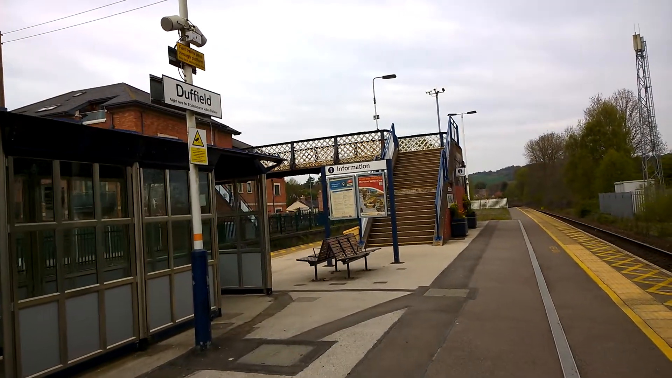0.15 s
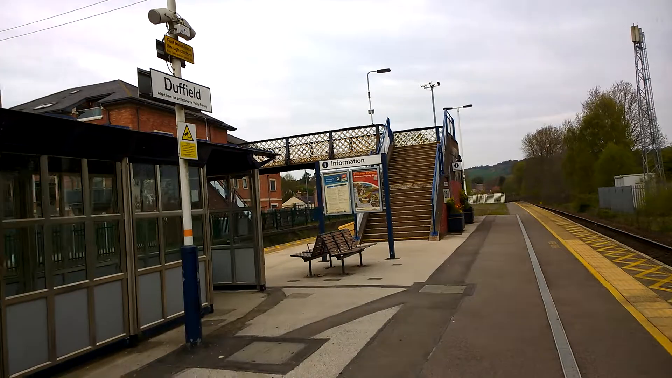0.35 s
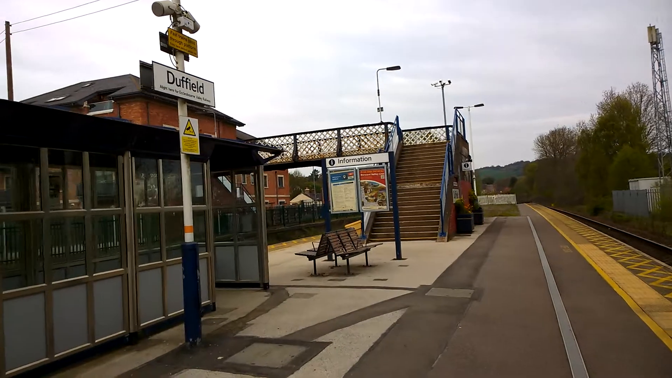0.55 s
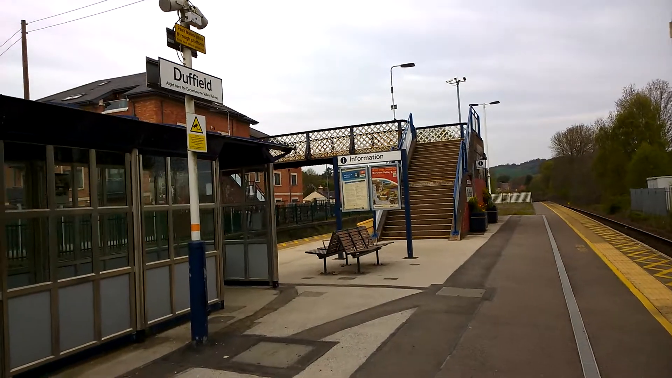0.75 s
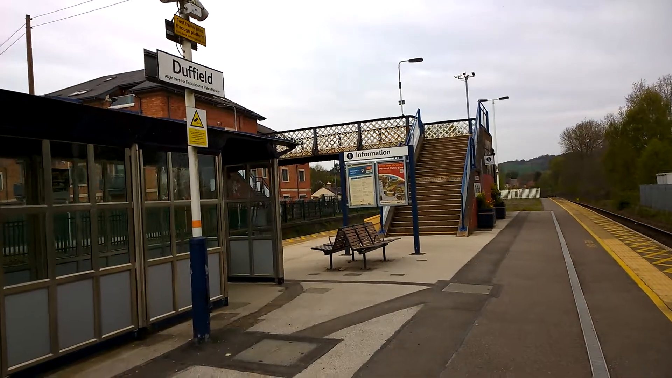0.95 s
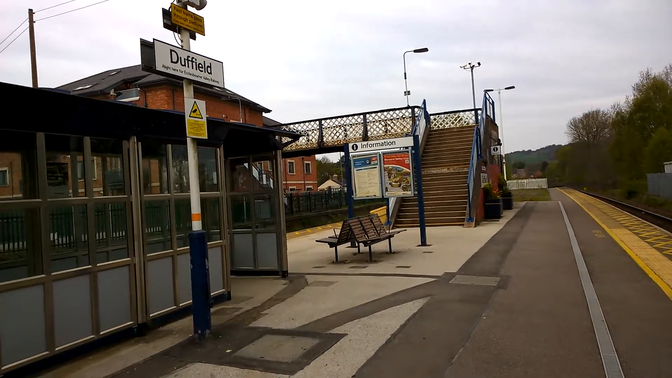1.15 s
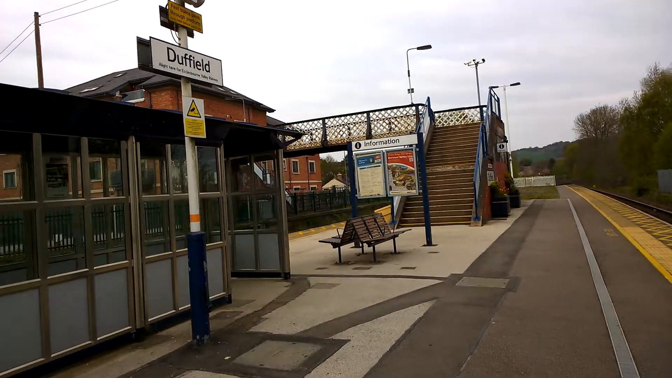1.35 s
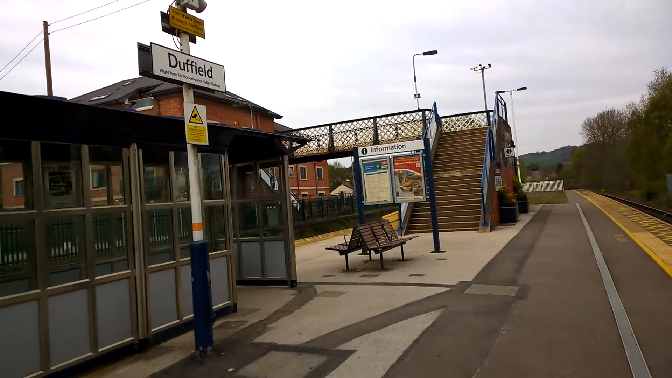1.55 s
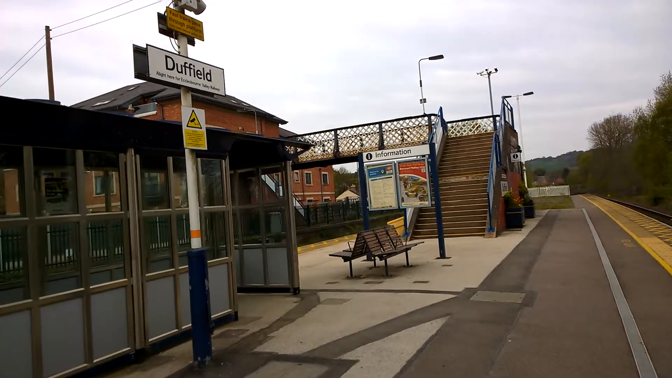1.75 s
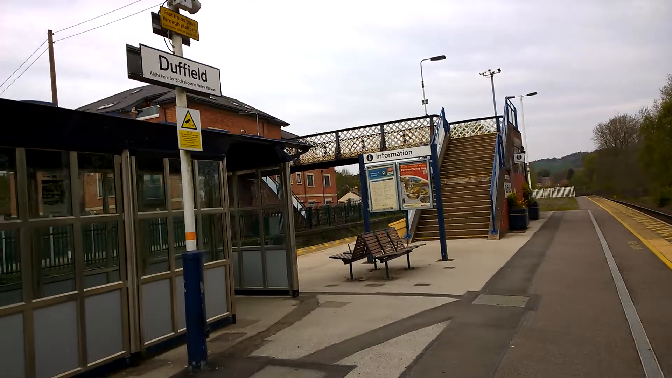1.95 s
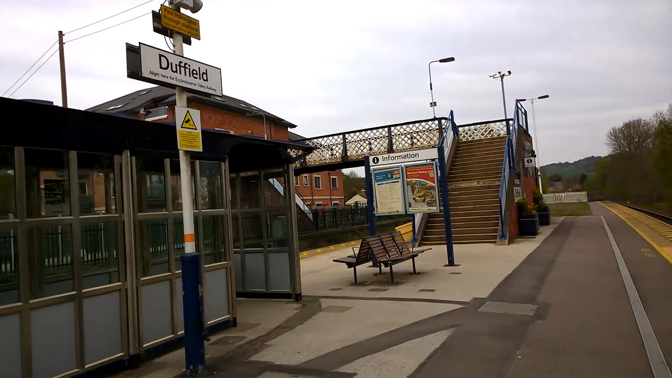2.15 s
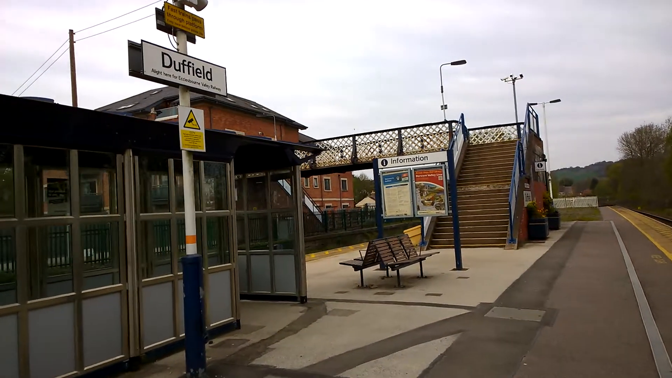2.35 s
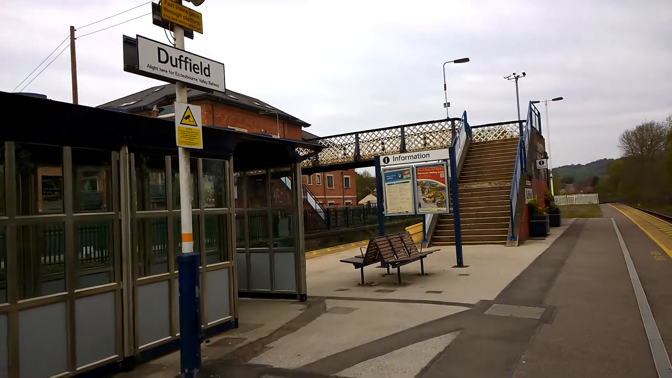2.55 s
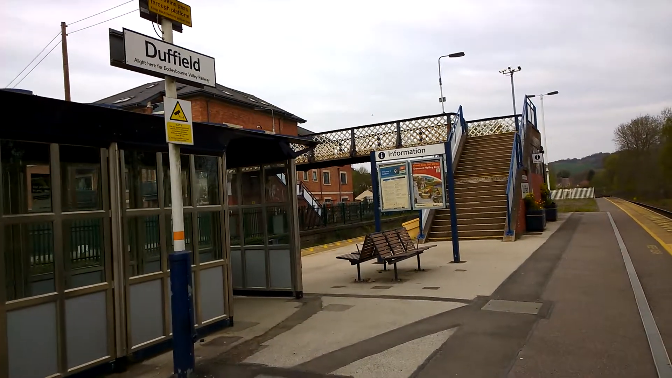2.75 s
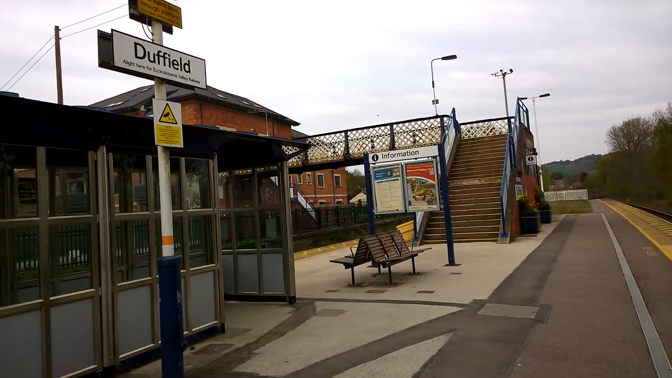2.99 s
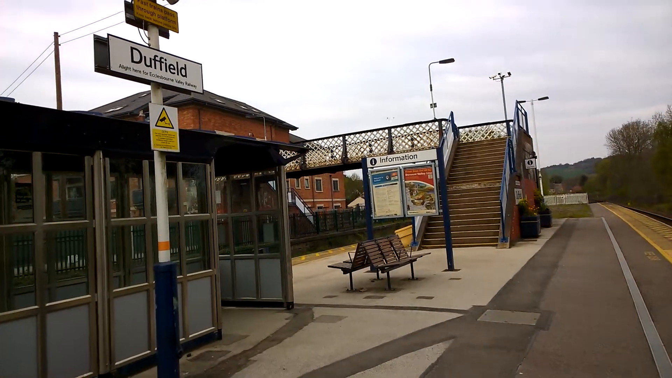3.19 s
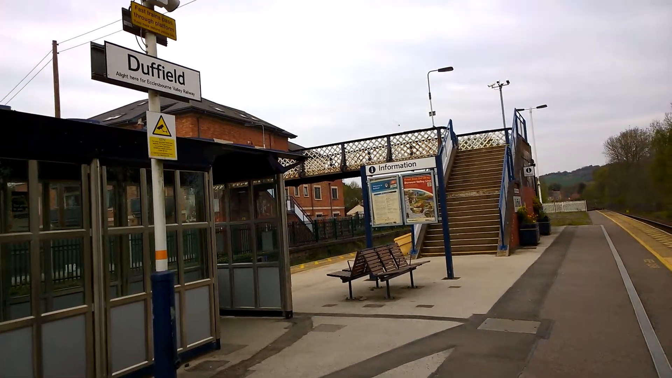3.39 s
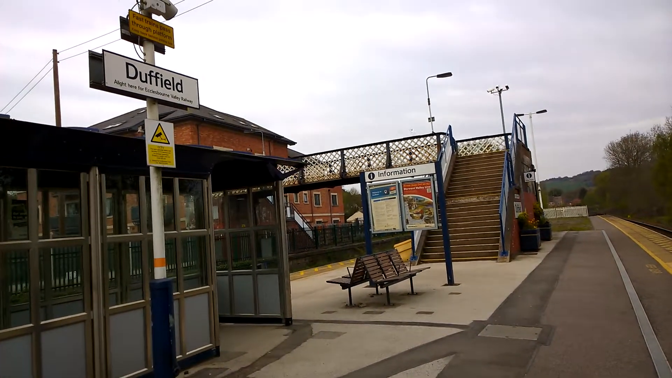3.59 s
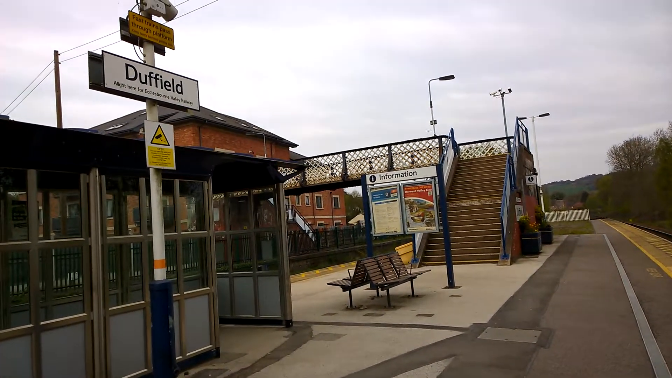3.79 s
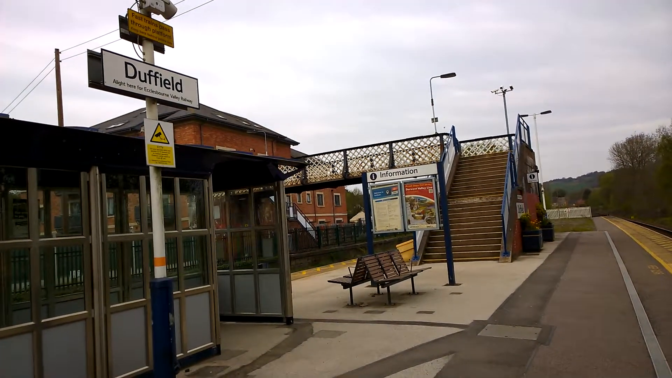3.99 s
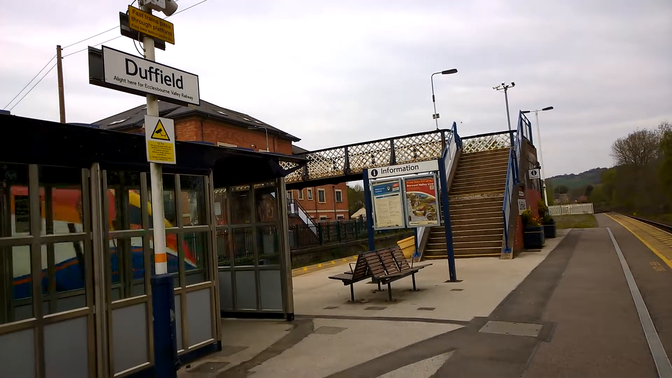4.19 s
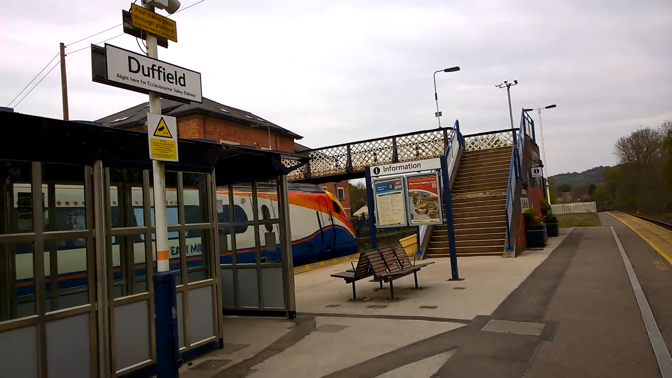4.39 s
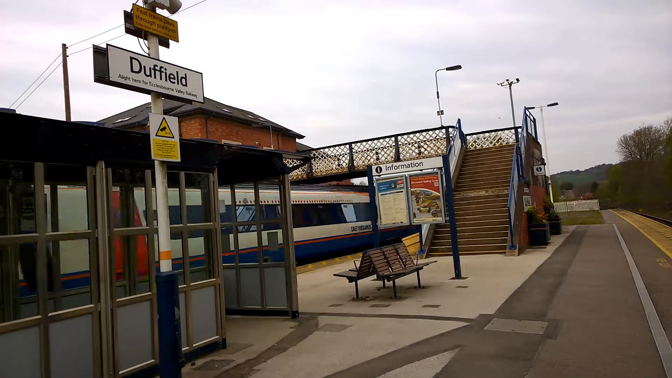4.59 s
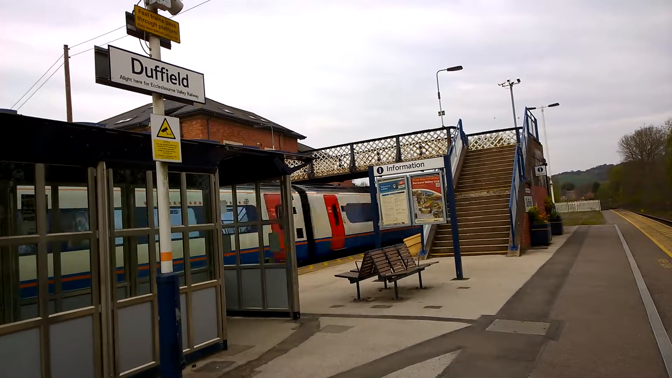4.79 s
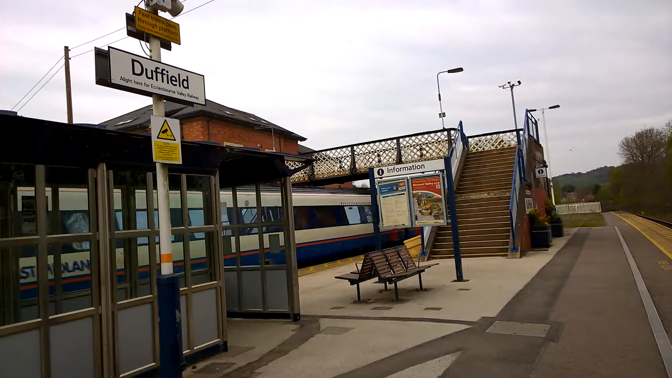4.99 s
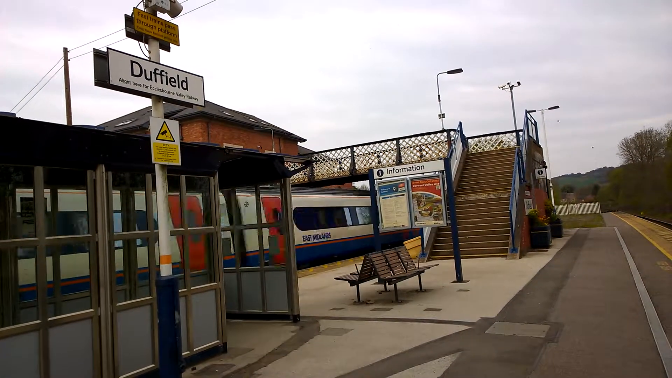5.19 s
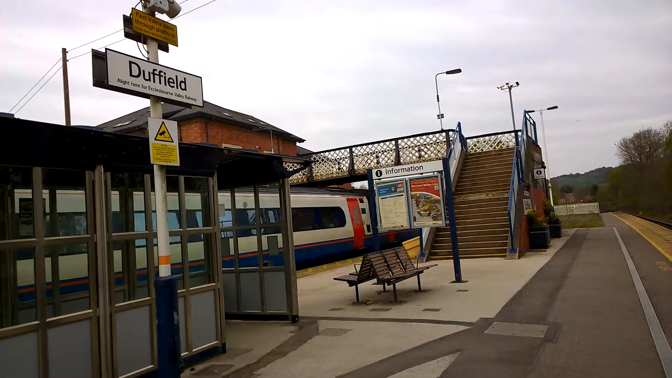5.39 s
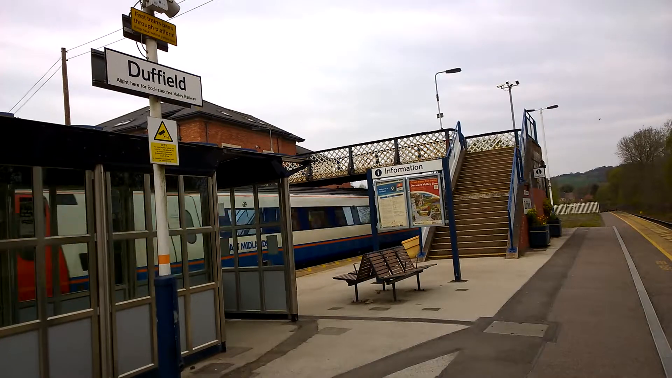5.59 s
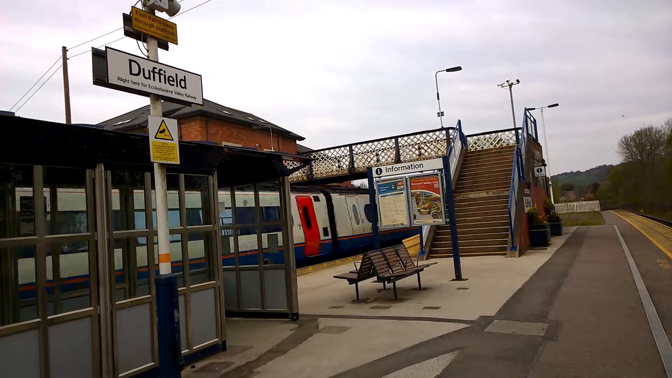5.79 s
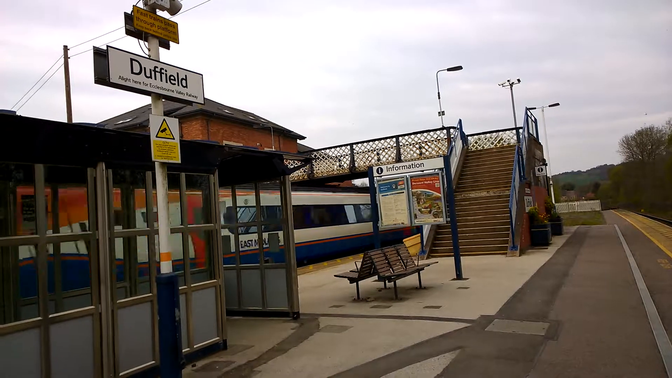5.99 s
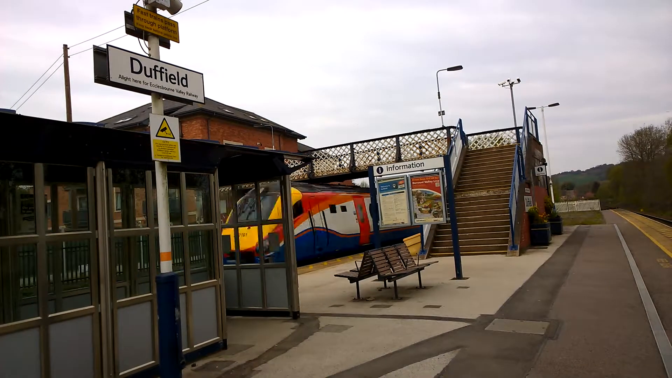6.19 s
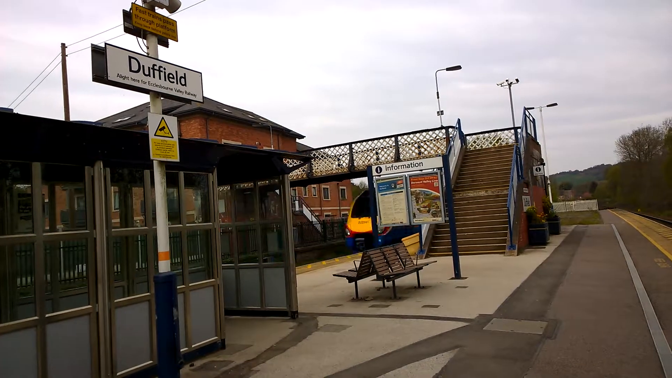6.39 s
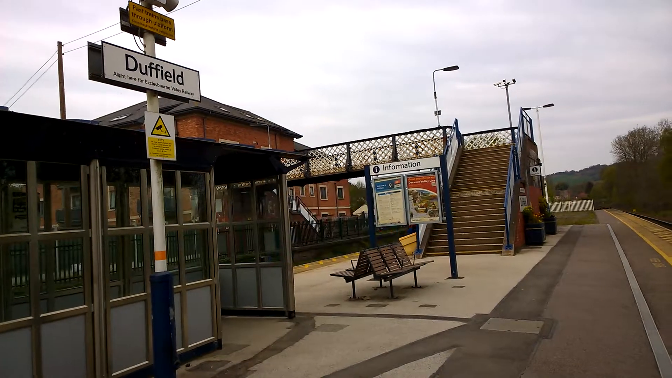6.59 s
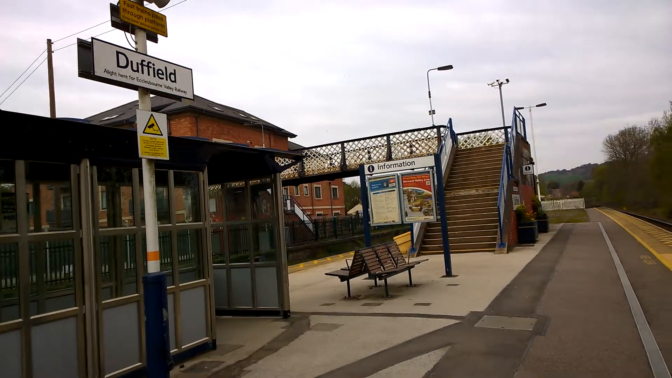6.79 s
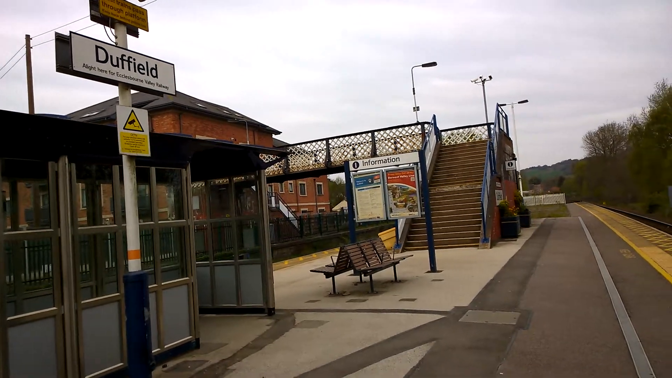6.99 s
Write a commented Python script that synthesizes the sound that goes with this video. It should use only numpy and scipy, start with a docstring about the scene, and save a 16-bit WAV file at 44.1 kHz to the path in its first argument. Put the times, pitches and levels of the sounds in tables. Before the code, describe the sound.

Stereo handheld microphone on the far platform of a small station. Wind rumbles low while cloth rubs lightly nearby. A train approaches with surging bass and thin metallic rail singing, then rushes by for about two seconds, a dense roar with bogie howls, bursts of hiss and whistles sliding down in pitch. It recedes quickly, leaving rumble and fading rail hiss.

```python
"""A fast diesel train runs through a country station, behind a shelter, heard from the far platform.
Rumble, wheel roar, hiss and rushing air are coloured noises that swell and fade; singing rails and
bogies are narrow noise bands. Underfloor engines (tone stacks) and whistles drop in pitch going by.
A breeze rumbles on the two microphone ports throughout, over a quiet platform and a rustling sleeve."""
import sys
import numpy as np
from scipy import signal
from scipy.fft import rfft, irfft
from scipy.io import wavfile
from scipy.ndimage import uniform_filter1d

SR = 44100
rng = np.random.default_rng(int(sys.argv[2]) if len(sys.argv) > 2 else 0)


def inscribe(sig):
    """Save sig as 16-bit PCM at rate SR to the path in sys.argv[1].

    A 1-D sig is mono; a 2-D sig holds one channel per row.
    Samples are clipped to [-1, 1] before scaling.
    """
    pcm = np.round(np.clip(np.atleast_2d(sig).T, -1, 1) * 32767)
    wavfile.write(sys.argv[1], SR, pcm.astype(np.int16))


N = 310905

SIZE, HOP = 1024, 256  # samples in a spectral frame, and between frames
HZ = np.fft.rfftfreq(SIZE, 1 / SR)
FRAME_S = np.arange(N // HOP + 5)[:, None] * HOP / SR  # a column: time runs down, frequency across
TIME = np.arange(N) / SR
# the nose draws level, the middle is abreast, the tail has gone by (s)
NOSE_S, MIDDLE_S, TAIL_S = 3.807, 4.88, 5.737
ABREAST_S = 0.49  # the treble is undulled for this long either side of the middle
MACH = .135  # speed of the train over that of sound


def amp(db):
    """Decibels to gain."""
    return 10 ** (np.asarray(db) / 20)


def evened(x):
    """Scales to rms 1."""
    return x / np.sqrt(np.mean(abs(x) ** 2) + 1e-20)


def read(points, hz=HZ):
    """Reads a spectrum table on a log-frequency axis."""
    f, value = np.transpose(points)
    return np.interp(np.log(hz + 1), np.log(f + 1), value)


def follow(rows, t=FRAME_S):
    """The columns of a curve table at the times t."""
    s, *columns = np.transpose(rows)
    return [np.interp(t, s, column) for column in columns]


def drift(rate_hz):
    """Slow random wander of rms 1, smoothed above the given rate."""
    count = len(FRAME_S)
    corner = np.fft.rfftfreq(count, HOP / SR) / rate_hz
    spectrum = rfft(rng.standard_normal(count)) / (1 + corner ** 2)
    return evened(irfft(spectrum, count))


def hump(s, rise_s, fall_s):
    """A bell of height 1 in time."""
    return np.exp(-.5 * ((FRAME_S - s) / np.where(FRAME_S < s, rise_s, fall_s)) ** 2)


def gust(s, rise_s, fall_s, db):
    """Level in dB of one rush of noise."""
    return db + 10 * np.log10(hump(s, rise_s, fall_s) + 1e-20)


def together(*levels_db):
    """Level in dB of unrelated sounds heard at once: their powers add."""
    return 10 * np.log10(sum(amp(db) ** 2 for db in levels_db))


def passing(nose_db, middle_db, tail_db, near_s, ahead_db, behind_db):
    """Level in dB of a long source: it follows the cars going by and falls with distance before and after."""
    abreast_db = np.interp(FRAME_S, [NOSE_S, MIDDLE_S, TAIL_S], [nose_db, middle_db, tail_db])
    ahead = np.maximum(NOSE_S - FRAME_S, 0)
    behind = np.maximum(FRAME_S - TAIL_S, 0)
    loss_ahead_db = ahead_db * np.log10(1 + ahead / near_s)
    loss_behind_db = behind_db * np.log10(1 + behind / near_s)
    return abreast_db - loss_ahead_db - loss_behind_db


def layer(spectrum, level_db, knee_hz=16000, loss_db=0):
    """Power of a coloured noise; above the knee it dulls, in dB per kHz and per second of distance."""
    shape = amp(read(spectrum)) ** 2
    away_s = np.maximum(abs(FRAME_S - MIDDLE_S) - ABREAST_S, 0)
    dull_db = loss_db * away_s * np.maximum(HZ - knee_hz, 0) / 1000
    return shape / shape.sum() * amp(level_db - dull_db) ** 2


def band(hz, width):
    """Power spectrum of a noisy resonance, summing to 1."""
    shape = np.exp(-.5 * ((HZ - hz) / width) ** 2) + 1e-20
    return shape / shape.sum(axis=-1, keepdims=True)


def swell(s, length, hz, width, db):
    """Power of a noisy resonance that rises and fades."""
    return band(hz, width) * amp(db) ** 2 * hump(s, length, length)


def doppler(t, abreast, glide_s):
    """Pitch factor of a source moving along the track; the nearer it passes, the quicker the glide."""
    along = t - abreast
    return 1 / (1 + MACH * along / np.hypot(along, glide_s))


# Share of the sound that reaches the microphone straight. Each row: frequency in Hz, share from 0 to 1.
STRAIGHT_SHARE = [(50, 0.5), (250, 1), (500, 0.64), (1200, 0.59), (3300, 0.49), (6000, 0.08), (10000, 0.1),
                  (16000, .1)]
# The two ports ring differently. Each row: frequency in Hz, left minus right in dB.
PORT_DIFFERENCE = [(100, 2.5), (500, 0.5), (950, 1), (1900, 2), (2500, 0.5), (3200, -6.5), (3800, -2.5),
                   (4400, 1.5), (5200, 3), (6400, -8), (7600, 4.5), (8800, 2), (10000, -2), (12000, 5)]


def ports(power, lead_ms, spacing_ms=0.53):
    """Noise at two spaced ports: a direct wave that reaches the left one first, plus a diffuse field."""
    a, b, c, d = rng.standard_normal((*power.shape, 4)).transpose(2, 0, 1)
    share = np.clip(read(STRAIGHT_SHARE), 0, 1)
    khz = HZ / 1000
    direct = share * np.exp(-2j * np.pi * khz * lead_ms)
    diffuse = (1 - share) * np.sinc(2 * khz * spacing_ms)
    same = (direct + diffuse) * .994  # what the ports have in common; never quite all of it
    left = a + 1j * b
    right = same * left + np.sqrt(np.maximum(1 - abs(same) ** 2, 0)) * (c + 1j * d)
    half_db = read(PORT_DIFFERENCE) / 2
    frames = np.array([left * amp(half_db), right * amp(-half_db)]) * np.sqrt(power)
    sound = signal.istft(frames.swapaxes(1, 2), nperseg=SIZE, noverlap=SIZE - HOP)[1]
    return np.sqrt(3 / 2) * sound[:, :N]  # makes up for the overlap of independent frames


# The quiet of the platform. Each row: frequency in Hz, relative level in dB per Hz.
PLATFORM_COLOUR = [(100, 6), (1000, -12), (3000, -19), (4500, -18), (6100, -16), (8000, -32), (12000, -29),
                   (16000, -36)]


def platform():
    """Steady faint noise, heaviest in the bass."""
    return layer(PLATFORM_COLOUR, -61.5)


# The breeze on the microphone ports. Each row: frequency in Hz, relative level in dB per Hz.
BREEZE_COLOUR = [(4, -45), (12, -16), (24, -3), (35, 11), (52, 0), (80, -16), (120, -28), (400, -65),
                 (1500, -100)]


def breeze():
    """Moving air on the ports: a steady random rumble peaking near 35 Hz."""
    return layer(BREEZE_COLOUR, -32.5)


# A sleeve rustling by the right port. Each row: time in seconds, rise in seconds, fall in seconds, level in dB.
SLEEVE_RUBS = [(.04, .02, .02, -71), (.4, .045, .03, -64.5), (.61, .03, .02, -65), (.825, .022, .022, -65),
               (1.51, .018, .05, -65), (1.67, .06, .08, -63), (1.92, .07, .03, -69)]


def sleeve(ring_hz=6220, ring_width_hz=420, skirt_width_hz=1300, skirt_db=-5):
    """Cloth rubs close by: faint wide noise with a ring in it, stronger in the right port."""
    colour = band(ring_hz, ring_width_hz) + amp(skirt_db) ** 2 * band(ring_hz, skirt_width_hz)
    rubs = sum(amp(db) ** 2 * hump(s, rise, fall) for s, rise, fall, db in SLEEVE_RUBS)
    return ports(colour * rubs, 0) * amp([[-7], [0]])


# Fans and turbochargers whistling by. Each row: seconds when abreast, swell time in seconds,
# pitch before the Doppler shift in Hz, width in Hz, level in dB.
FAN_WHISTLES = [(4.35, .17, 8750, 240, -39), (4.705, .085, 5400, 450, -22.5), (5.2, .1, 5400, 350, -34),
                (5.3, .1, 8900, 240, -38.5), (5.73, .11, 9000, 260, -44.5)]


def whistles(early_s=.12, glide_s=.11):
    """Each noisy whistle is loudest as it comes up, and slides down in pitch going by."""
    power = 0
    for s, length, hz, width, db in FAN_WHISTLES:
        heard_hz = hz * doppler(FRAME_S, s, glide_s)
        power = power + swell(s - early_s, length, heard_hz, width, db)
    return power


# Underfloor engines. Each row: seconds when abreast, firing rate before the Doppler shift in Hz,
# share of the drone in dB.
UNDERFLOOR_ENGINES = [(4.3, 90, -14), (5.25, 89.4, -16), (5.65, 89.8, .5)]
# Engine note. Each row: multiple of the firing rate, level against the firing tone in dB.
ENGINE_NOTE = [(2 / 3, -20), (5 / 6, -12), (0.99, 0), (4 / 3, -15), (5 / 3, -11.5), (3, -28.5), (4, -20.5)]
# Swells of the drone. Each row: time in seconds, swell time in seconds, lift of the firing tone in dB,
# lift of its octave in dB.
DRONE_SURGES = [(1.38, .24, 1, 13), (2.55, .19, 10, 7), (3.02, .12, 6, 7), (5.13, .11, 1.5, 8.5),
                (5.48, .12, 7, 1)]
# How the firing tone and its octave pass the platform. Each holds: dB at the nose, dB at the middle,
# dB at the tail, near zone in seconds, fall ahead and fall behind in dB per decade of distance.
FIRING_LEVELS = (-19.5, -21.5, -21, .6, 35, 23)
OCTAVE_LEVELS = (-33, -35, -30, .6, 26, 5)


def engines(waver_hz=4, lead_ms=0.096, glide_s=.18):
    """Exhaust tones under Doppler shift; ground reflections make each one waver in level and phase."""
    waver, wander_rad = .25, .3  # rms, of level (as a fraction) and of phase
    firing_db, octave_db = passing(*FIRING_LEVELS), passing(*OCTAVE_LEVELS)
    for s, length, firing_lift_db, octave_lift_db in DRONE_SURGES:
        firing_db = firing_db + firing_lift_db * hump(s, length, length)
        octave_db = octave_db + octave_lift_db * hump(s, length, length)
    # the other multiples follow the firing tone
    tones = [(multiple, firing_db + db) for multiple, db in ENGINE_NOTE] + [(2, octave_db)]
    drone = np.zeros(N, complex)
    for s, hz, share_db in UNDERFLOOR_ENGINES:
        turns = np.cumsum(hz * doppler(TIME, s, glide_s)) / SR
        for multiple, db in tones:
            level = amp(db[:, 0] + share_db) * (1 + waver * drift(waver_hz))
            phase = wander_rad * drift(waver_hz) + 2 * np.pi * rng.random()
            path = np.interp(TIME, FRAME_S[:, 0], level * np.exp(1j * phase))
            drone += path * np.exp(2j * np.pi * multiple * turns)
    right = np.interp(TIME - lead_ms / 1000, TIME, drone.real)  # reaches the right port later
    return np.sqrt(2) * np.array([drone.real, right]) * amp([[.7], [-1.3]])


# Rails and wheels singing. Each row: time of the peak in seconds, swell time in seconds,
# frequency in Hz, width in Hz, level in dB.
SINGING_RAILS = [(.5, 0.4, 860, 31, -54), (3.05, 0.7, 1730, 69, -48), (3.13, 0.43, 3580, 220, -51.5),
                 (3.8, 0.28, 3550, 230, -40.5), (2.65, 0.21, 4700, 330, -52.5), (3, 0.22, 7250, 90, -66),
                 (3.15, 0.1, 9620, 80, -73), (4.9, 0.48, 2265, 70, -36.5), (6.8, 0.31, 8300, 85, -62),
                 (6.1, 0.066, 9800, 110, -54), (6.3, 0.25, 8700, 730, -54.5), (6.53, 0.034, 6600, 600, -53),
                 (6.37, .35, 4800, 450, -54.5)]


def singing():
    """Steel rings at its resonances: narrow noises, several of them swelling before the train is here."""
    return sum(swell(*row) for row in SINGING_RAILS)


# Howl of air round each bogie. Each row: time in seconds, swell time in seconds, frequency in Hz,
# width in Hz, level in dB.
BOGIE_HOWLS = [(3.95, 0.12, 400, 134, -21), (4.36, 0.075, 430, 60, -22), (4.52, 0.055, 300, 35, -25),
               (4.8, 0.042, 365, 28, -21), (5.26, .04, 485, 45, -19.5), (5.72, .09, 385, 18, -29.5)]


def bogies():
    """Air howls round the bogies: low narrow noises, one after another."""
    return sum(swell(*row) for row in BOGIE_HOWLS)


# Colour of the rail hiss and of the rushing air. Each row: frequency in Hz, relative level in dB per Hz.
HISS_COLOUR = [(2800, 1.5), (4100, -2), (4900, -1.5), (5500, 2.5), (6300, 4), (6900, 2), (7600, -7.5),
               (8800, -11.5), (10000, -7), (11500, -43), (16000, -50)]
AIR_COLOUR = [(2000, -13), (5000, 6.5), (8000, 5.5), (10000, 5), (11200, 1), (12500, -2.5), (15800, -5)]
# How the two pass the platform. Each holds: dB at the nose, dB at the middle, dB at the tail,
# near zone in seconds, fall ahead and fall behind in dB per decade of distance.
HISS_LEVELS = (-30, -30, -36.5, 1.56, 116, 81)
AIR_LEVELS = (-41, -32.5, -39.5, 1.14, 119, 90)
# Bursts of treble as the rails start to hiss and as bogies and gaps between cars rush by.
# Each row: time in seconds, rise in seconds, fall in seconds, rail hiss in dB, rushing air in dB.
TREBLE_BURSTS = [(2.42, 0.076, 0.32, -58.5, -85), (2.94, .05, 0.23, -53, -63),
                 (4.07, 0.055, 0.03, -32, -35), (4.31, 0.071, .04, -50, -32),
                 (4.57, .035, 0.04, -22.5, -25.5), (4.8, 0.074, 0.015, -22, -21.5),
                 (5.14, 0.059, 0.046, -27.5, -33.5), (5.29, .06, 0.012, -31, -27.5),
                 (5.71, .04, 0.037, -52, -36.5)]


def hiss_and_air():
    """Rail hiss and dragged air: treble noises with bursts, duller the farther off the train is."""
    hiss_bursts = [gust(s, rise, fall, db) for s, rise, fall, db, _ in TREBLE_BURSTS]
    air_bursts = [gust(s, rise, fall, db) for s, rise, fall, _, db in TREBLE_BURSTS]
    hiss_db = together(passing(*HISS_LEVELS), *hiss_bursts)
    air_db = together(passing(*AIR_LEVELS), *air_bursts)
    hiss = layer(HISS_COLOUR, hiss_db, knee_hz=7200, loss_db=1.0)
    air = layer(AIR_COLOUR, air_db, knee_hz=11800, loss_db=4.0)
    return hiss + air


# Colour of the rumble and of the roar. Each row: frequency in Hz, relative level in dB per Hz.
RUMBLE_COLOUR = [(4, -45), (12, -14), (22, -6), (36, 6.5), (55, -2), (85, -14.5), (125, -23.5), (200, -36),
                 (500, -73.5)]
ROAR_COLOUR = [(30, -3.5), (60, 1), (85, 4), (125, 0), (200, 1.5), (280, -3.5), (400, -4.5), (520, -12),
               (650, -18.5), (900, -36), (2000, -75)]
# How the two pass the platform. Each holds: dB at the nose, dB at the middle, dB at the tail,
# near zone in seconds, fall ahead and fall behind in dB per decade of distance.
RUMBLE_LEVELS = (-17.5, -18, -20, 0.76, 28.5, 32)
ROAR_LEVELS = (-17.5, -20, -20, 0.57, 29, 28.5)
# Low surges of air around the cars. Each row: time in seconds, swell time in seconds, rumble in dB, roar in dB.
AIR_BUFFETS = [(1.5, .17, -32.5, -50), (2.55, 0.2, -27, -32.5), (3.05, 0.11, -23, -33),
               (3.57, 0.12, -18, -30), (4.23, 0.054, -16.5, -37), (5.98, 0.094, -21, -29.5)]


def rumble_and_roar():
    """Heavy bodies and the air they push: low noises that swell in surges."""
    rumble_surges = [gust(s, length, length, db) for s, length, db, _ in AIR_BUFFETS]
    roar_surges = [gust(s, length, length, db) for s, length, _, db in AIR_BUFFETS]
    rumble_db = together(passing(*RUMBLE_LEVELS), *rumble_surges)
    roar_db = together(passing(*ROAR_LEVELS), *roar_surges)
    return layer(RUMBLE_COLOUR, rumble_db) + layer(ROAR_COLOUR, roar_db)


# Colour of the rolling and of the brighter wheel noise. Each row: frequency in Hz, relative level in dB per Hz.
ROLL_COLOUR = [(300, -17.5), (550, -9), (700, -2), (840, 1.5), (1000, -4.5), (1250, -9), (1500, -11.5),
               (2000, -14), (3000, -28.5), (6000, -62)]
WHEEL_COLOUR = [(900, -11), (1400, 1), (1700, 4.5), (2000, -3.5), (2280, -2.5), (2650, -2.5), (3100, -1),
                (3550, 0), (4100, -8), (5000, -8), (8000, -26), (16000, -65)]
# How the two pass the platform. Each holds: dB at the nose, dB at the middle, dB at the tail,
# near zone in seconds, fall ahead and fall behind in dB per decade of distance.
ROLL_LEVELS = (-26, -25.5, -27, 0.5767, 30, 33)
WHEEL_LEVELS = (-31.5, -27, -32.5, 1.13, 50, 50.5)


def rolling():
    """Wheels on rails: broad middle and treble noise, the treble dulled with distance."""
    roll = layer(ROLL_COLOUR, passing(*ROLL_LEVELS))
    wheels = layer(WHEEL_COLOUR, passing(*WHEEL_LEVELS), knee_hz=2820, loss_db=1.55)
    return roll + wheels


def turbulence(patchy_db, flutter_db, flutter_hz):
    """Eddies bend the sound: patches in time and frequency, and a flutter shared by all frequencies."""
    patches = rng.standard_normal((len(FRAME_S), len(HZ)))
    patches = uniform_filter1d(patches, size=14, axis=0)
    patches = evened(uniform_filter1d(patches, size=9, axis=1))
    flutter = drift(flutter_hz)[:, None]
    return amp(patchy_db * patches + flutter_db * flutter) ** 2


def train():
    """Power of all the noise of the train, bent by the air between the track and the far platform."""
    noise = rumble_and_roar() + rolling() + hiss_and_air() + singing() + bogies() + whistles()
    return noise * turbulence(patchy_db=1.5, flutter_db=0.66, flutter_hz=23.1)


# Direction of the train. Each row: time in seconds, lead of the left port in ms.
TRAIN_BEARING = [(0, .25), (3, .24), (4.3, 0.34), (5.9, 0.4), (6.1, 0.11)]


def scene():
    """The train over the breeze and the quiet of the platform."""
    outdoors = platform() + breeze()
    lead_ms = follow(TRAIN_BEARING)[0]
    return ports(train() + outdoors, lead_ms) + engines() + sleeve()


def record(dry):
    """The highest peaks are rounded off and the ends faded; then the band limit of the recorder."""
    rounded = dry / (1 + (dry / .97) ** 8) ** (1 / 8)
    held = rounded * signal.windows.tukey(N, .001)
    lowpass = signal.firwin(511, 15850, window=("kaiser", 9), fs=SR)  # edge in Hz
    return signal.oaconvolve(held, lowpass[None], "same")


dry = scene()
out = record(dry)
inscribe(out)
```